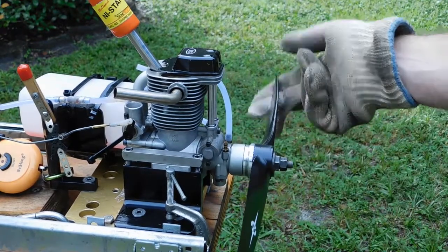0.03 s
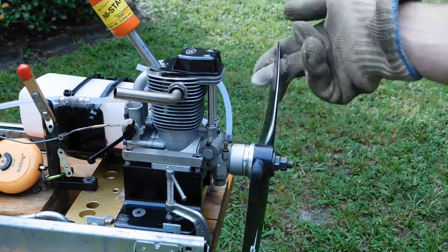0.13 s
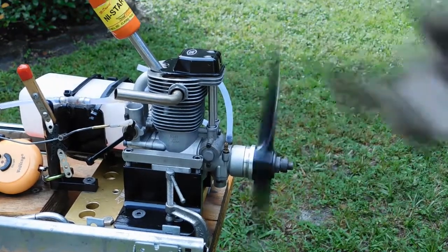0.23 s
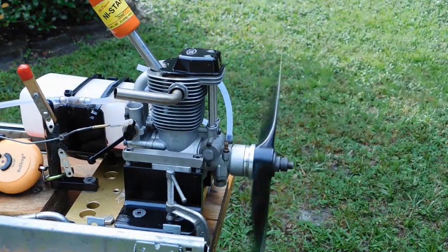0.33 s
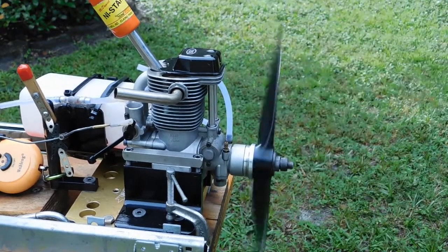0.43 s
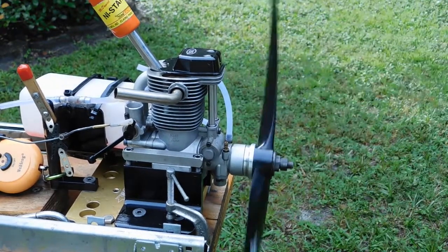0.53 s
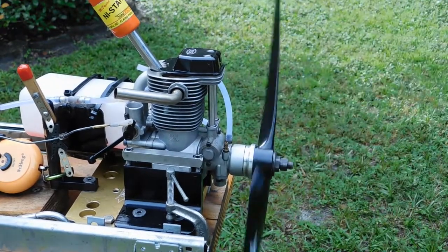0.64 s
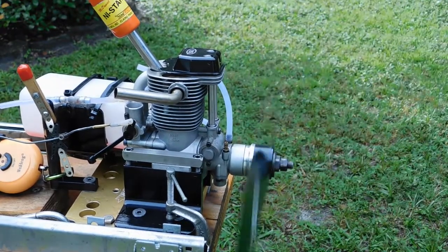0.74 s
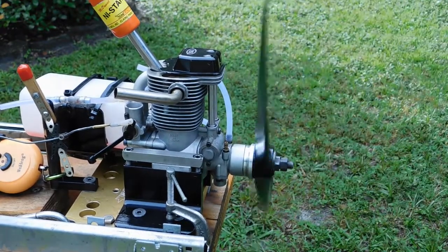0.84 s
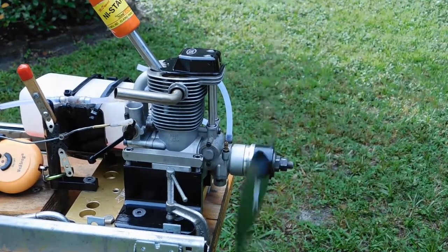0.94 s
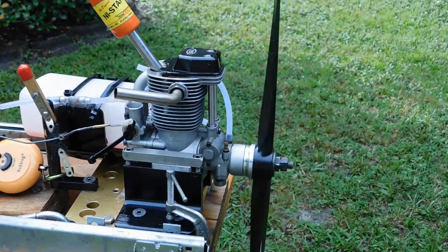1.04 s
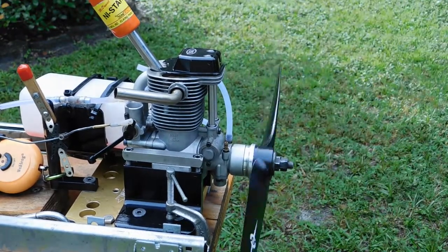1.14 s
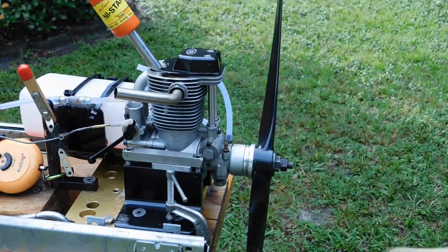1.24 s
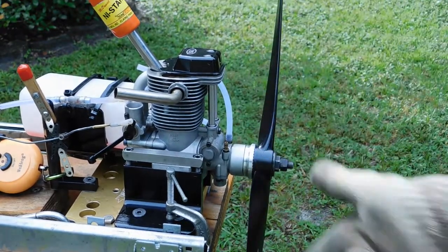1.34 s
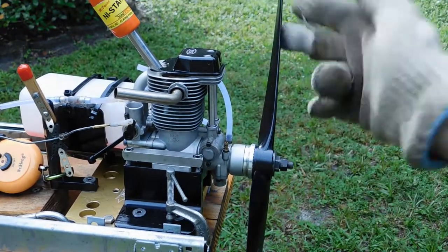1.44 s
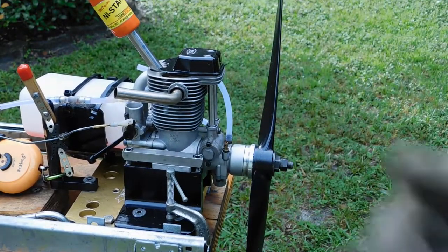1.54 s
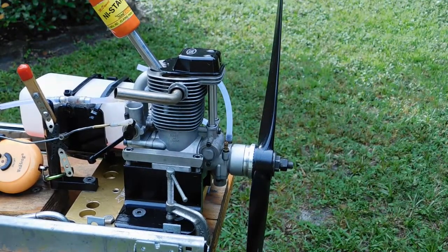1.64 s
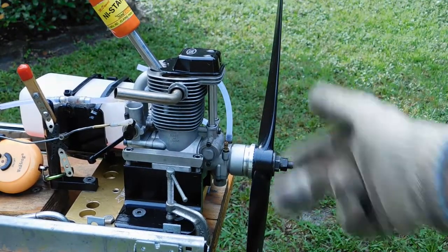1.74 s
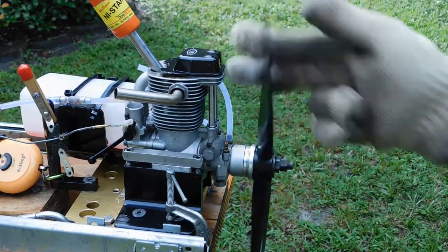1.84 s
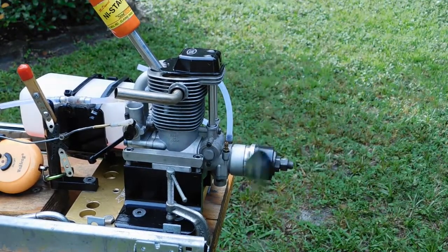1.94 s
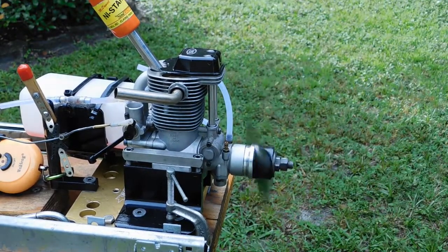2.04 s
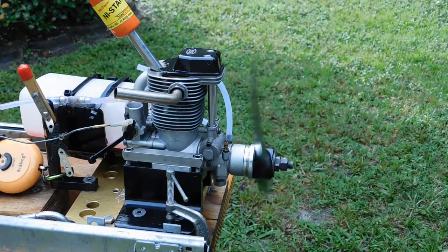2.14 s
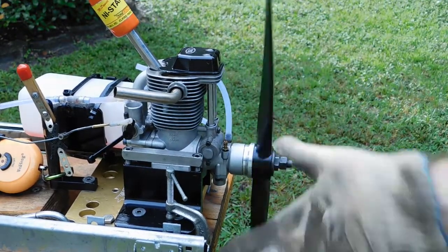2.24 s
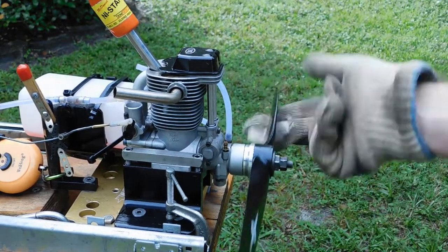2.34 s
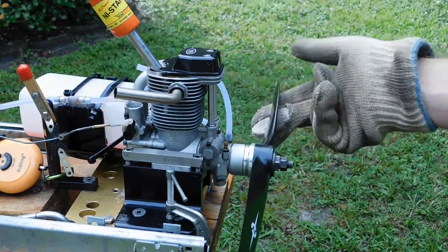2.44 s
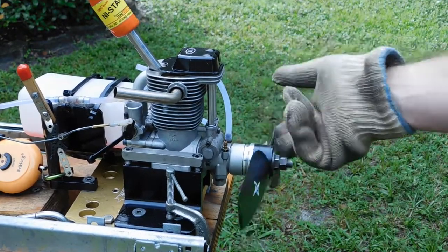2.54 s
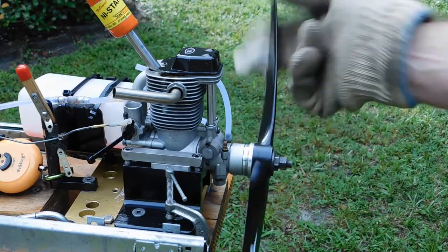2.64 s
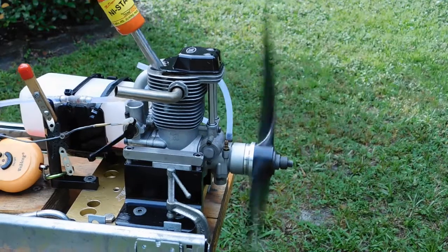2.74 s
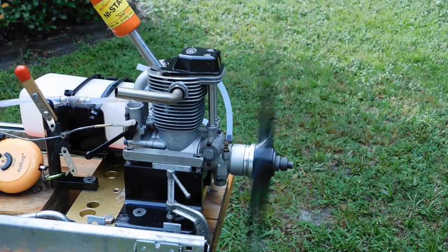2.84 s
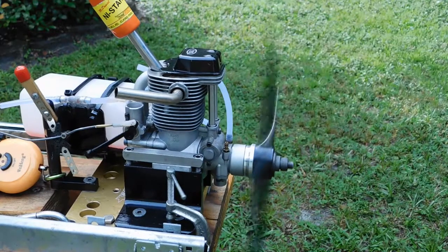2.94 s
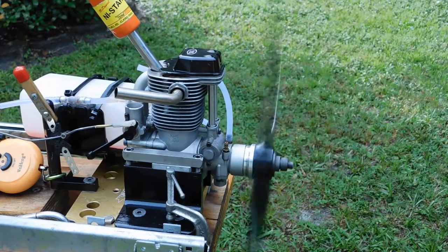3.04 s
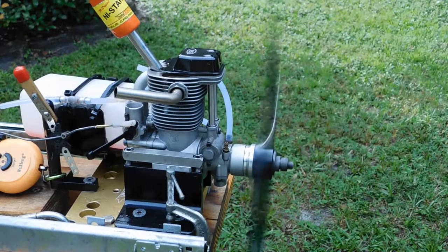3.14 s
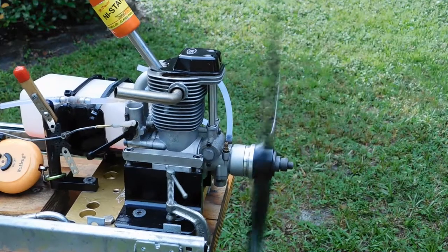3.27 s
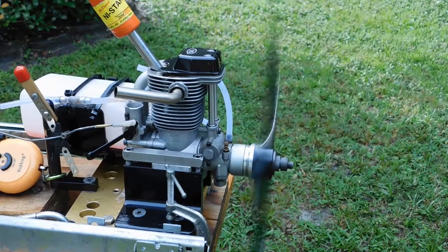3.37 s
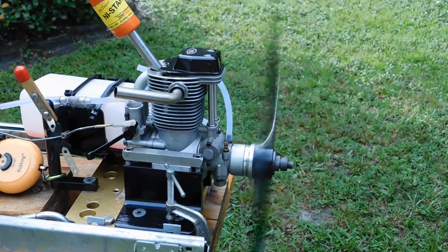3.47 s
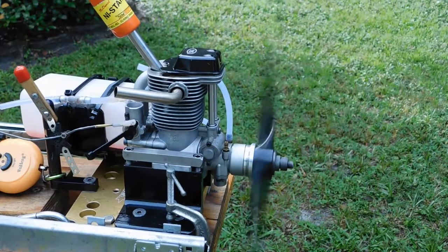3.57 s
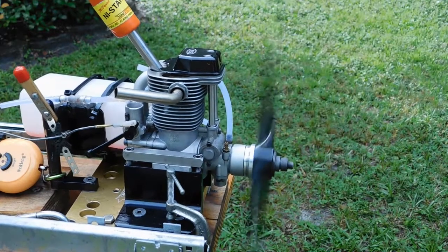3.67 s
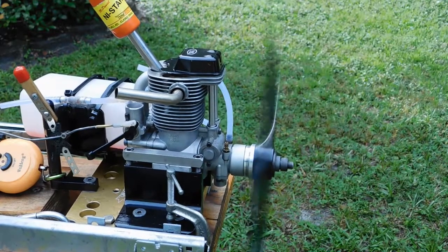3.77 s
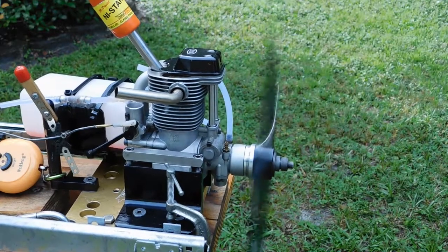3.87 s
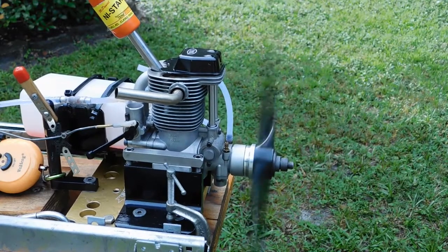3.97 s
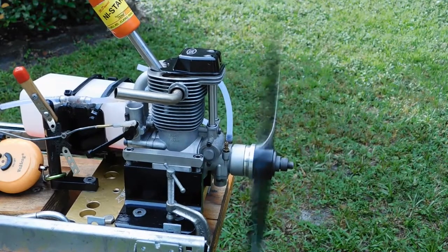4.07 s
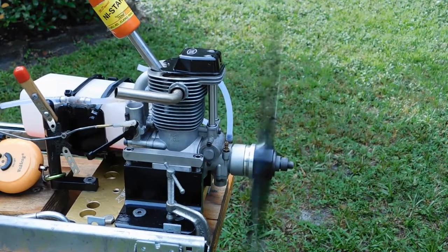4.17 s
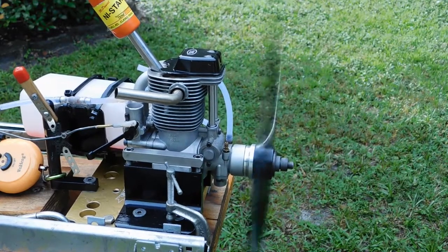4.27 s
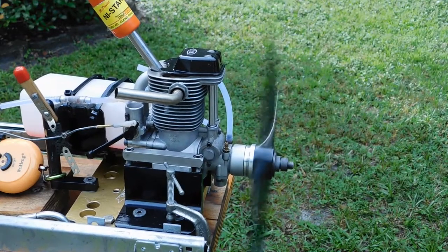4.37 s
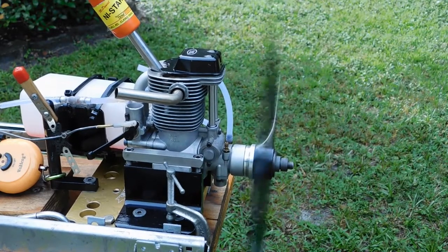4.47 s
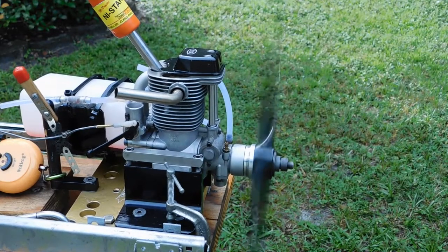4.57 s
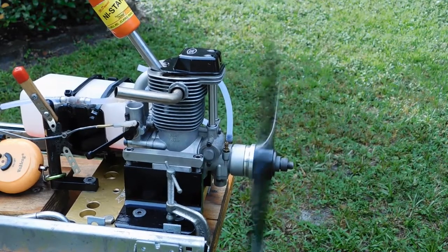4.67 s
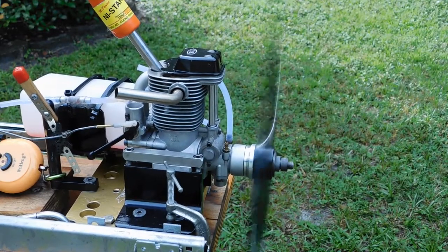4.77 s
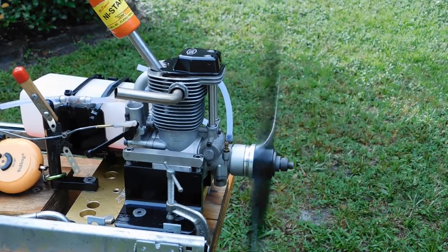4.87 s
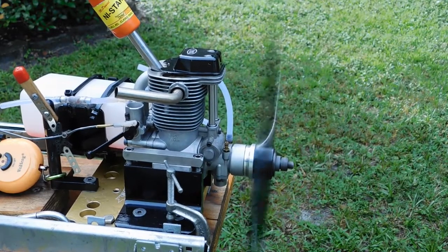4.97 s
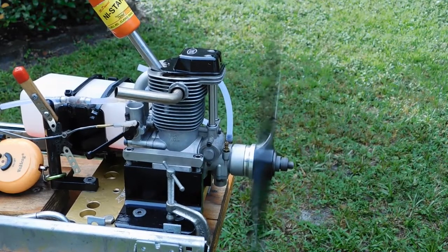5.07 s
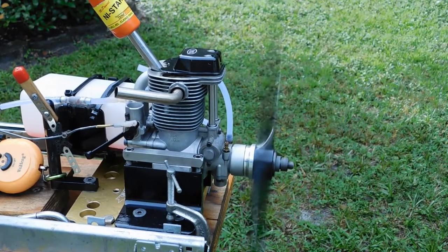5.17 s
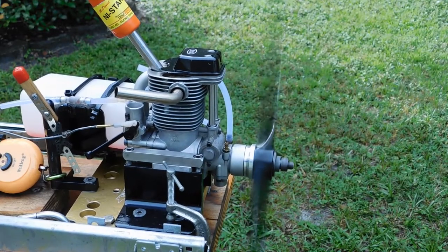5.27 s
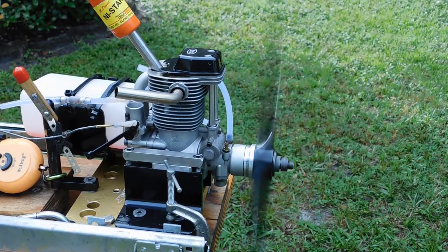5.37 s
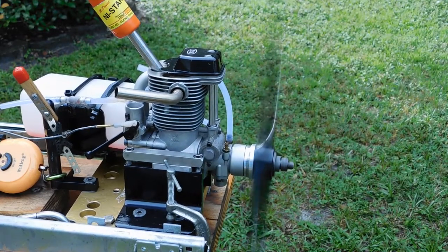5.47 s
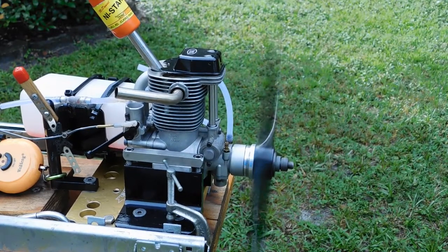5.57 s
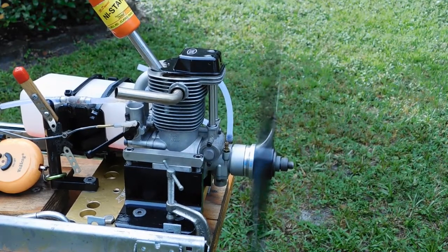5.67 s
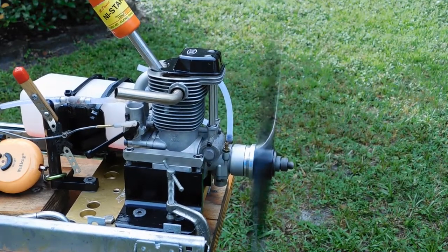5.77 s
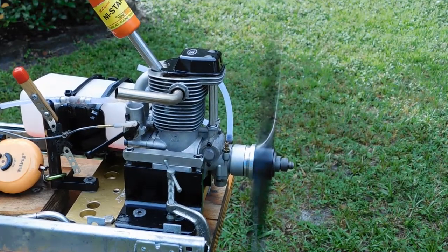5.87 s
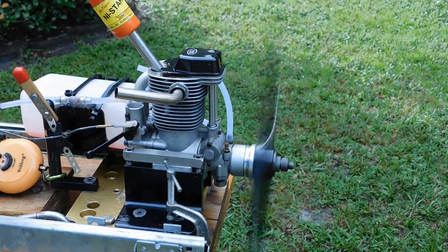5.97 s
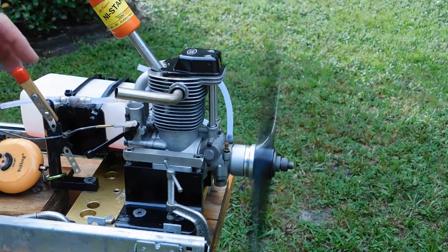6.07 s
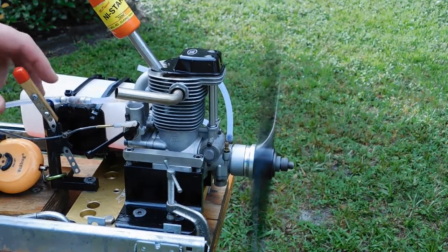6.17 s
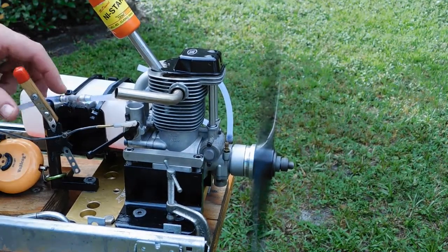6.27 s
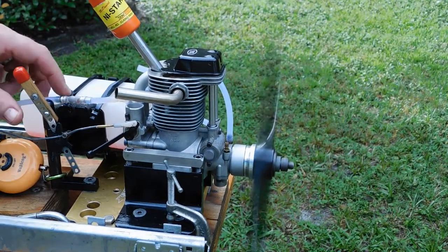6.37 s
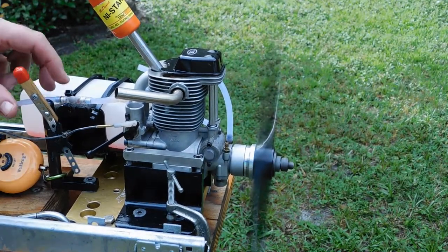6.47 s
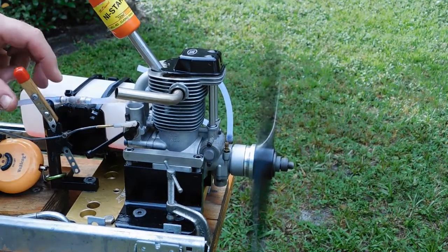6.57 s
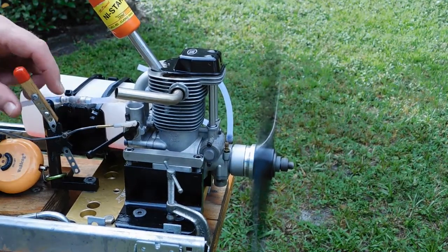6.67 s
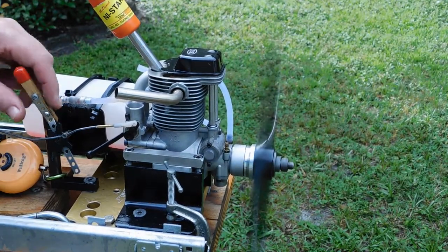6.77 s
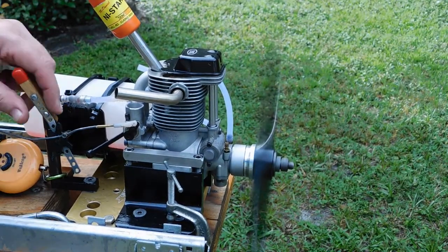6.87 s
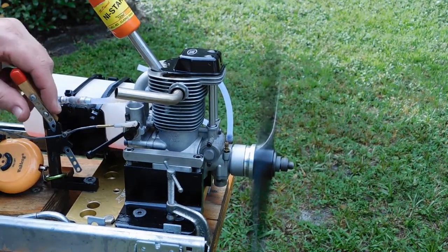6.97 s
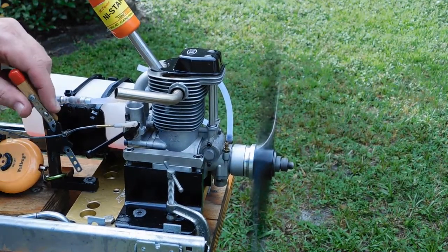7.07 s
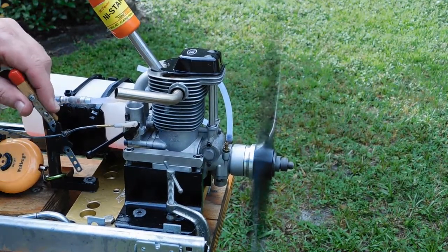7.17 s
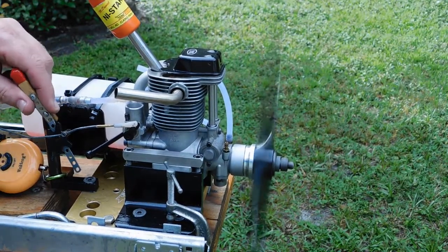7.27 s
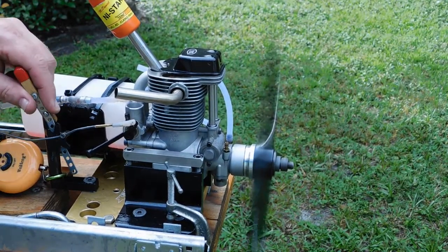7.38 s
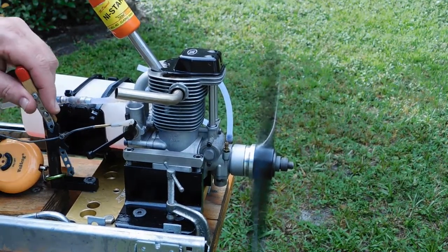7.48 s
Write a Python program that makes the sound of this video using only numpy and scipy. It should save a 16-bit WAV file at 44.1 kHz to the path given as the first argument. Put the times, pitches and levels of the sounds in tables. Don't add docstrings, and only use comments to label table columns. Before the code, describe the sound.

A small four-stroke engine's propeller is flicked, rattles to rest, then a second flick catches into loud, stuttering exhaust pops that speed up outdoors.

```python
import sys
import numpy as np
from scipy import signal
from scipy.fft import rfft, irfft, next_fast_len
from scipy.io import wavfile
from scipy.ndimage import uniform_filter1d

SR = 44100
rng = np.random.default_rng(int(sys.argv[2]) if len(sys.argv) > 2 else 0)


def magnitude_from_level(level_db):
    exponent = np.asarray(level_db, float) / 20
    return 10 ** exponent


def wav_out(sig):
    wavfile.write(sys.argv[1], SR, np.round(np.clip(np.atleast_2d(sig).T, -1, 1) * 32767).astype(np.int16))


N = 331191
CATCH_S = 2.725

# frequency [Hz], likeness [-1 to 1].
NEAR_ALIKE = [(100, .97), (1000, .9), (2500, .65), (5000, .6), (12000, .72)]


def rms_one(x):
    return x / np.sqrt(np.mean(x ** 2) + 1e-20)


def highpass(x, hz):
    return signal.sosfilt(signal.butter(2, hz, "high", fs=SR, output="sos"), x)


def coloured(x, points):
    hz, db = np.transpose(points)
    size = next_fast_len(x.shape[-1])
    bins = np.arange(size // 2 + 1) * SR / size + 1
    gain = magnitude_from_level(np.interp(np.log(bins), np.log(hz), db))
    return irfft(rfft(x, size) * gain, size)[..., :x.shape[-1]]


def stereo_noise(spectrum, likeness, shape):
    mid, side = rng.standard_normal((2, *shape))
    hz, alike = np.transpose(likeness)
    alike = np.clip(alike, -.99, .99)
    mid = coloured(mid, np.c_[hz, 10 * np.log10(1 + alike)])
    side = coloured(side, np.c_[hz, 10 * np.log10(1 - alike)])
    return rms_one(coloured(np.array([mid + side, mid - side]), spectrum))


def resonance(x, hz, width):
    r = np.exp(-np.pi * width / SR)
    poles = [1, -2 * r * np.cos(2 * np.pi * hz / SR), r * r]
    return signal.lfilter([(1 - r * r) / 2, 0, (r * r - 1) / 2], poles, x)


def laid(times, sounds):
    out, size = np.zeros((2, N + SR)), sounds.shape[-1]
    for s, sound in zip(times, sounds.transpose(1, 0, 2)):
        first = round(s * SR)
        out[:, first:first + size] += sound
    return out[:, :N]


def swell(start, rise, loss_db):
    t = np.arange(N) / SR - start
    return np.clip(t / rise, 0, 1) * magnitude_from_level(-loss_db * np.clip(t - rise, 0, None))


def thin_tone(rows, wobble):
    s, hz, db = np.transpose(rows)
    t = np.arange(N) / SR
    hz, db = [np.interp(t, s, column, -120, -120) for column in (hz, db)]
    waver = 1 + wobble * rms_one(uniform_filter1d(rng.standard_normal(N), 200))
    return magnitude_from_level(db + 2) * np.sin(2 * np.pi * np.cumsum(hz * waver) / SR)


def garden():
    # frequency [Hz], density [dB per Hz].
    air_colour = [(12, -30), (20, -17), (38, 1), (60, -15), (81, -1), (187, -6.5), (328, -9.5), (527, -9),
                  (607, -7.5), (1290, -9.5), (1660, -10.5), (11400, -30.5), (16000, -25)]
    # frequency [Hz], likeness [-1 to 1].
    far_alike = [(60, 0.98), (240, 0.7), (950, 0.48), (3770, -0.38), (15000, 0.26)]
    return magnitude_from_level(-51.5) * stereo_noise(air_colour, far_alike, (N,))


def bird():
    # time in seconds, pitch in Hz, level in dB.
    call = [
        (0, 3560, -72),
        (.08, 3450, -63),
        (.17, 3280, -62),
        (.26, 3220, -66),
    ]
    return thin_tone(call, 0.012)


def body(x):
    # frequency [Hz], width [Hz], level [dB].
    body_modes = [(850, 70, 1.5), (1595, 110, 9), (2470, 740, -1.5), (3000, 75, 8), (3430, 180, 0),
                  (4740, 87, -40), (7500, 60, -20), (8200, 260, -29), (8850, 250, -24.5)]
    out = magnitude_from_level(-2) * x
    for k, (hz, width, db) in enumerate(body_modes):
        out = out + (-1) ** k * magnitude_from_level(db) * resonance(x, hz, 1.2 * width)
    return rms_one(out)


def knocks():
    # time in seconds, peak in dB, loudest frequency in Hz.
    tick_events = [(0.267, -13.5, 2380), (.278, -10, 2100), (.303, -13, 2550), (.312, -9.5, 2440),
                   (.351, -8.5, 3000), (0.392, -10.5, 3400), (0.444, -10, 3480), (0.497, -10.5, 3070),
                   (.542, -22, 3680), (.623, -24, 2020), (.644, -26, 2230), (0.693, -31, 3080),
                   (0.736, -26, 3080), (.869, -30.5, 2020), (.908, -28.5, 2180), (1.026, -34.5, 2390),
                   (1.923, -24, 3320), (1.952, -29, 2200), (2.031, -34, 3180), (2.113, -33, 2770),
                   (2.348, -36, 3640)]
    # time in seconds, peak in dB, loudest frequency in Hz.
    thud_events = [(.333, -14, 890), (.424, -14.5, 890), (.483, -16, 910), (.568, -37, 760),
                   (0.581, -26, 1450), (.664, -21, 700), (.752, -34, 1450), (.778, -25, 1500),
                   (.794, -24, 785), (.831, -38, 764), (1.099, -37, 760), (1.194, -35, 880),
                   (1.859, -20.5, 916), (1.895, -33, 850), (1.973, -28, 780), (2.179, -32, 885),
                   (2.27, -26, 1450), (2.369, -32, 958), (2.73, -15, 856)]
    at, peak_db, hz = np.transpose(np.vstack([tick_events, thud_events]))
    bright_db = np.repeat([-10.5, -30], [len(tick_events), len(thud_events)])
    t = np.arange(1800) / SR
    raw = stereo_noise([(300, 4), (700, 8.0), (4000, 2.0), (15000, -30)], NEAR_ALIKE, (len(at), len(t)))
    burst = raw * (t / .003) ** 1.5 * magnitude_from_level(-60 * t / .017)
    own = np.stack([rms_one(resonance(burst[:, k], hz[k], 0.056 * hz[k])) for k in range(len(at))], 1)
    edge = burst * magnitude_from_level(-60 * t / 0.049)
    crack = rms_one(coloured(edge, [(2500, -27.0), (4500, -21), (9000, 2.0), (15000, -2)]))
    crack = crack * magnitude_from_level(bright_db + 7)[:, None]
    return laid(at - .003, magnitude_from_level(peak_db - 22.5)[:, None] * (body(burst) + 0.99 * own + crack))


def rattle():
    # start in seconds, rise in seconds, peak in dB, loss in dB per second.
    pushes = [
        (.262, 0.027, -31.5, 44.5),
        (1.86, 0.019, -50.5, 63),
        (2.722, .015, -41, 307),
    ]
    push_db, push_fades = -2, 1.4
    grains = magnitude_from_level(1.6 * np.minimum(rng.exponential(1, N), 4)) * (rng.random(N) < 900 / SR)
    grains = uniform_filter1d(grains, 40)
    grains = grains * stereo_noise([(300, -11), (700, 13.0), (15000, -17.5)], NEAR_ALIKE, (N,))
    low = stereo_noise([(80, -26), (130, 8), (350, 12.5), (600, -24.5)], NEAR_ALIKE, (N,))
    grain_level, low_level = 0, 0
    for s, rise, db, loss_db in pushes:
        grain_level = grain_level + magnitude_from_level(db) * swell(s, rise, loss_db)
        low_level = low_level + magnitude_from_level(db + push_db) * swell(s, rise, push_fades * loss_db)
    return magnitude_from_level(7.0) * grain_level * body(grains) + low_level * low


def squeak():
    # time in seconds, pitch in Hz, level in dB.
    squeak_course = [(0.96, 10671, -61.5), (0.984, 11288, -69), (1.084, 12677, -58), (1.15, 12704, -66),
                     (1.18, 14306, -61), (1.26, 14298, -64), (1.278, 12323, -59), (1.31, 9045, -60)]
    return magnitude_from_level(-4) * thin_tone(squeak_course, .009)


def crank():
    # time in seconds, firings per second.
    full_speed = [(2.7422, 15.259), (2.808, 20.194), (2.877, 24.029), (3.074, 25.227), (3.294, 23.346),
                  (3.448, 20.558), (3.577, 20.564), (3.58, 22.539), (3.799, 25.078), (4.137, 28.157),
                  (4.45, 26.105), (5.012, 28.116), (5.117, 29.681), (5.719, 31.114), (6.084, 33.689),
                  (6.933, 36.653), (7.351, 27.724), (7.447, 31.101)]
    # time in seconds, blast in dB and gulp in dB against the usual.
    weak_firings = [(2.983, -7.5, -7), (3.067, -2.5, 6.5), (3.109, -2, 6), (3.195, -6.5, 4.5),
                    (3.284, -7.5, -2), (3.378, -3.5, 3.5), (3.669, -4.5, 4), (3.878, -1, 5.5),
                    (3.957, -1.5, 7), (4.072, -7.5, 6.5), (4.149, -.5, 6), (4.224, -8, 2), (4.301, -1, 7),
                    (4.418, -5.5, 9), (4.765, -.5, 6), (7.115, -.5, 5)]
    drag_blast, drag_gulp, drag_kept = .147, .082, .67
    edges, weak, lost = [full_speed[0][0]], [], 0
    while edges[-1] < N / SR:
        now = edges[-1]
        blast_db, gulp_db = next((db for s, *db in weak_firings if abs(s - now) < .01), [0, 0])
        weak.append([blast_db, gulp_db])
        lost = drag_kept * lost - drag_blast * blast_db + drag_gulp * max(gulp_db, 0)
        edges.append(now + 1 / (np.interp(now, *np.transpose(full_speed)) - lost))
    return np.array(edges), np.array(weak)


def firings():
    # time in seconds, gas heat as a pitch factor, wetness of the mixture in dB.
    warming = [
        (2.74, 0.95, 4.5),
        (3.5, 0.81, 1.5),
        (4.5, .9, 1.4),
        (5.1, 0.96, 1),
        (5.65, 0.92, 1),
        (5.9, 1.126, 1.7),
        (7.0, 1.154, 0.5),
        (7.25, 1.26, 0.5),
        (7.5, 0.98, 6),
    ]
    leftover = .16, .35
    edges, weak = crank()
    at, length = edges[:-1], np.diff(edges)
    s, *columns = np.transpose(warming)
    heat, wet_db = [np.interp(at, s, column) for column in columns]
    unevenness = np.interp(heat, [.85, 1.15], [1, .45])
    chance = rng.standard_normal((len(at), 4)) * unevenness[:, None]
    extra = chance[:, :2] * [.7, 1.1] - np.roll(weak[:, [0]], 1, axis=0) * leftover
    extra = np.where(weak[:, [0]] < 0, weak, extra)
    pitch = 1.159 * heat ** 0.99 * (1 + 0.022 * chance[:, 3])
    pitch = pitch * magnitude_from_level(-.2 * np.clip(extra[:, 1] - 1.5, 0, 9))
    heat = heat * (1 + .02 * chance[:, 2])
    hiss_db = -7.5 + wet_db + 1.3 * extra[:, 0] + 1.0 * chance[:, 2]
    blast_db = -2.5 - 0.45 * wet_db + extra[:, 0]
    gulp_db = -21.5 + extra[:, 1]
    return [c[:, None] for c in (at, length, heat, blast_db, hiss_db, gulp_db, pitch)]


def exhaust(at, length, heat, blast_db, hiss_db, gulp_db, pitch):
    # frequency in Hz, level in dB, t60 in seconds, sign.
    stub_modes = [(1160, 2.2, .0061, -1), (1440, -5.2, .0061, -1), (1960, -5, .0075, -1),
                  (3200, -15, .0013, -1)]
    # frequency [Hz], density [dB per Hz].
    jet_colour = [(400, 0.5), (900, 9), (1500, 7.5), (2500, 7.5), (4000, 1), (6500, -2), (10000, -2),
                  (15000, -4)]
    # start in seconds, end as share of the cycle, first Hz, last Hz, level in dB.
    gulp_sweeps = [(.003, 0.363, 343, 798, -1)]
    t = np.arange(2600) / SR
    spread = rng.standard_normal((len(at), len(stub_modes)))
    shock = 0
    for k, (hz, db, t60, sign) in enumerate(stub_modes):
        ring = np.sin(2 * np.pi * hz * heat ** 0.14 * t)
        shock = shock + sign * magnitude_from_level(db + 0.5 * spread[:, [k]] - 60 * t / t60) * ring

    after = t - .0024 / heat
    open_valve = np.clip((t - .0013) / .0004, 0, 1)
    rebound = np.tanh(-after / .00013) * np.exp(-np.clip(after, 0, 1) / .003)
    flow = magnitude_from_level(-8.3 + 26 * (heat - 1)) * open_valve * rebound

    build_up = np.clip((t - .0001) / .001, 0, 1)
    main_jet = 1 / (1 + np.exp(np.clip(after / 0.00083, -30, 30)))
    blowing = build_up * (main_jet + 0.29 * np.exp(-t / 0.0061))
    jet = magnitude_from_level(hiss_db - 4.5) * blowing * stereo_noise(jet_colour, NEAR_ALIKE, shock.shape)

    gulp = 0
    for start, end, low_hz, high_hz, db in gulp_sweeps:
        way = np.clip((t - start) / (end * length - start), 0, 1)
        sweep_hz = low_hz * (high_hz / low_hz) ** way * pitch * (way > 0)
        turns = np.cumsum(sweep_hz, 1) / SR
        gulp = gulp + magnitude_from_level(db + gulp_db + 4) * np.sin(np.pi * way ** 1.4) * np.sin(2 * np.pi * turns)
    return laid(at[:, 0] - .00017, magnitude_from_level(blast_db) * (shock + flow) + jet + gulp)


def surroundings(direct):
    # delay in seconds, left level in dB, right level in dB.
    echo_paths = [(.0053, -23, -60), (0.0149, -12, -35), (0.0238, -25, -19), (.031, -19.5, -24)]
    scatter_db, scatter_t60_s, scatter_hz = -11, .16, 1600
    t = np.arange(8000) / SR
    sparse = rng.standard_normal((2, len(t))) * (rng.random(len(t)) < 500 / SR)
    sparse = sparse * magnitude_from_level(-60 * t / scatter_t60_s) * (t > .006)
    paths = np.array([sparse[0] + 0.72 * sparse[1], sparse[0] - 0.13 * sparse[1]])
    paths = signal.lfilter(*signal.butter(2, scatter_hz, fs=SR), paths)
    paths *= magnitude_from_level(scatter_db) / np.sqrt(np.sum(paths ** 2) / 2) * np.sqrt(2 * scatter_hz / SR)
    for lag, left_db, right_db in echo_paths:
        paths[:, round(lag * SR)] += magnitude_from_level([left_db, right_db])
    return direct + signal.fftconvolve(direct, paths, axes=1)[:, :N]


def valve_gear(at, length):
    # share of the cycle, frequency in Hz, level in dB, t60 in seconds.
    contacts = [
        (0.19, 2900, -18, 0.011),
        (0.49, 3200, -20.5, 0.0056),
        (.705, 3150, -17, 0.013),
        (.88, 4900, -26, 0.006),
        (.37, 1000, -20, 0.032),
    ]
    out, t = 0, np.arange(1000) / SR
    for share, hz, db, t60 in contacts:
        chance = rng.standard_normal((len(at), 4))
        phase = 2 * np.pi * hz * (1 + 0.066 * chance[:, [0]]) * t
        ring = np.sin(phase + np.array([1, -1])[:, None, None] * .5 * chance[:, [2]])
        rough = .5 * rng.standard_normal((2, len(at), len(t))) * magnitude_from_level(-60 * t / t60)
        clicks = magnitude_from_level(db + 1.05 * chance[:, [1]] - 60 * t / t60) * (ring + rough)
        out = out + laid((at + share * length)[:, 0] + 0.00019 * chance[:, 3], clicks)
    return out


def shaking():
    # frequency [Hz], density [dB per Hz].
    shake_colour = [(100, -22), (250, -17), (450, -13), (620, -5), (800, -6), (1000, 0), (1250, -6),
                    (1800, -10), (2500, -14), (4500, -22), (8000, -24), (13000, -26), (16000, -32)]
    lumps, grit = [rms_one(uniform_filter1d(uniform_filter1d(rng.standard_normal(N), size), size))
                   for size in (90, 200)]
    level = swell(CATCH_S, 0.05, -0.05) * magnitude_from_level(-27 + 2.25 * lumps)
    noise = stereo_noise(shake_colour, NEAR_ALIKE, (N,))
    high = highpass(noise, 3974)
    return level * (noise + high * (magnitude_from_level(3 * grit - 9.0) - 1))


def propeller():
    # passes per firing cycle, level in dB.
    blade_tones = [(2, -18), (4, 0), (8, -10)]
    edges, t = crank()[0], np.arange(N) / SR
    cycles = np.interp(t, edges, np.arange(len(edges)))
    over = np.interp(t, edges[:-1], 1 / np.diff(edges)) - 30
    level_db = -44 + 0.94 * np.where(over > 0, 0.82 * over, over)
    tones = sum(magnitude_from_level(db) * np.sin(2 * np.pi * k * cycles) for k, db in blade_tones)
    return -magnitude_from_level(level_db + 3) * tones


def wash():
    # time in seconds, peak in dB.
    gust_events = [(2.75, -55), (2.92, -34), (3.609, -45), (3.88, -43), (4.15, -49), (4.54, -58),
                   (4.88, -41), (5.65, -51), (6.12, -47), (6.42, -51), (6.77, -43), (6.9, -47), (7.5, -30)]
    wind = stereo_noise([(8, -30), (18, -12), (35, -1), (60, -16), (90, -8), (130, -27)],
                        [(20, 0.8), (90, 0.14)], (N,))
    t = np.arange(N) / SR
    gusts = sum(magnitude_from_level(db) * np.exp(-((t - s) / 0.067) ** 2) for s, db in gust_events)
    steady = magnitude_from_level(-46) * swell(CATCH_S, 0.045, 0)
    return (steady + gusts) * magnitude_from_level([[4.5], [.6]]) * wind


def later(x, lag):
    size = next_fast_len(N)
    turn = np.exp(-2j * np.pi * lag * np.arange(size // 2 + 1) / size)
    return irfft(rfft(x, size) * turn, size)[:N]


def scene():
    cycles = firings()
    engine = surroundings(exhaust(*cycles)) + valve_gear(*cycles[:2]) + shaking()
    for cut_hz in (125, 95):
        engine = highpass(engine, cut_hz)
    engine = engine + knocks() + rattle() + propeller()
    engine[1] = later(engine[1], .62)
    engine = engine * magnitude_from_level(0) * np.array([[magnitude_from_level(.35)], [magnitude_from_level(-.35)]])
    return engine + wash() + squeak() + bird() + garden()


def low_pass(x):
    return signal.sosfilt(signal.butter(12, 16690, fs=SR, output="sos"), x)


def record(dry):
    cut = signal.sosfilt(signal.cheby2(10, 50, 16500, fs=SR, output="sos"), dry)
    return low_pass(np.clip(cut, -1, 1))


dry = scene()
out = record(dry)
wav_out(out)
```